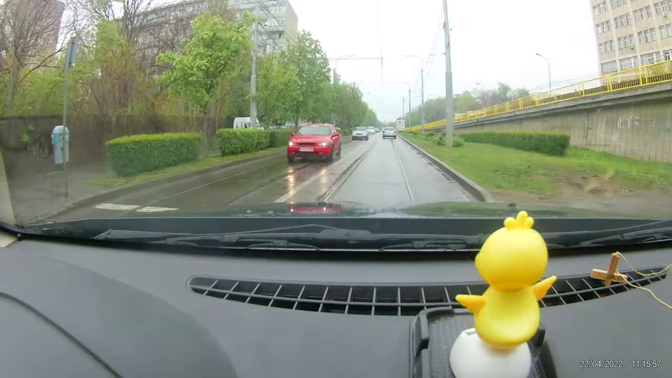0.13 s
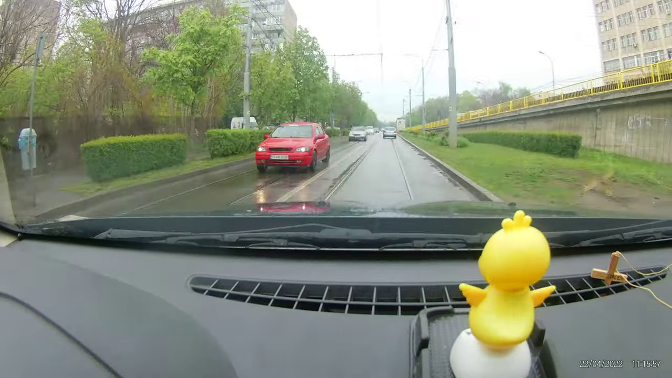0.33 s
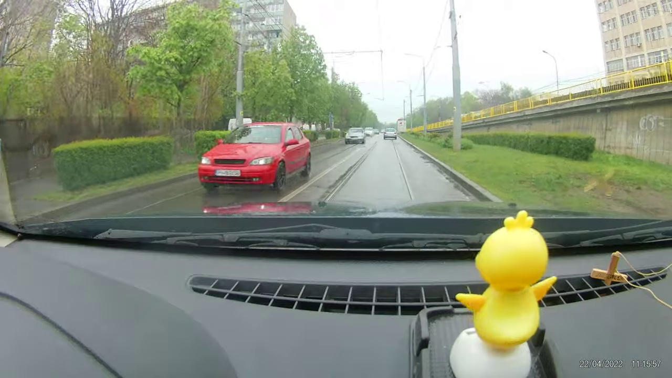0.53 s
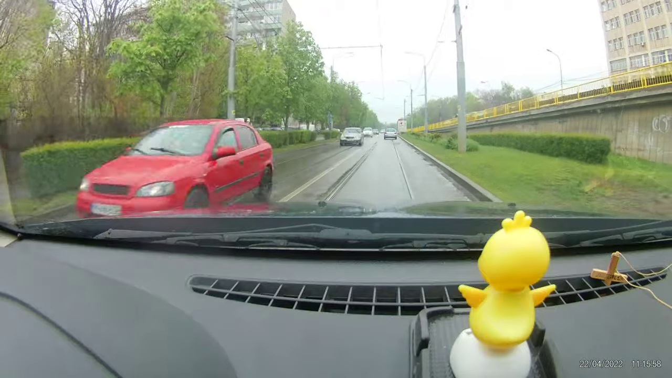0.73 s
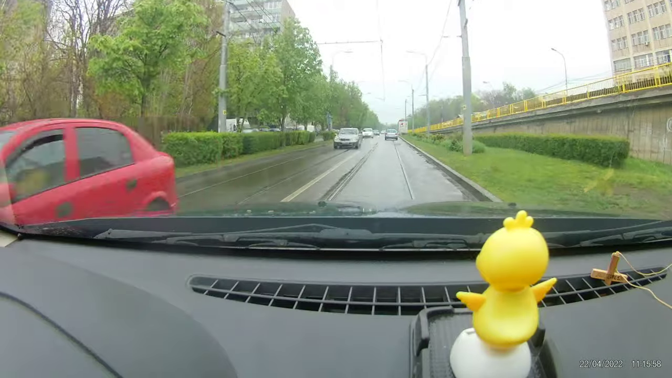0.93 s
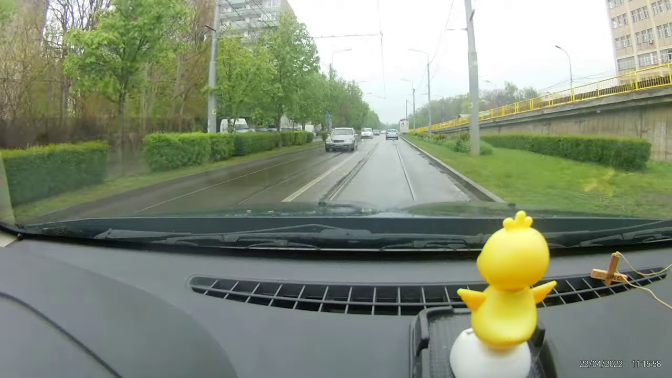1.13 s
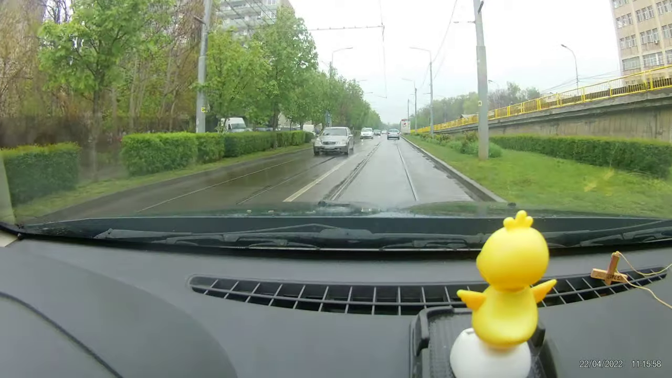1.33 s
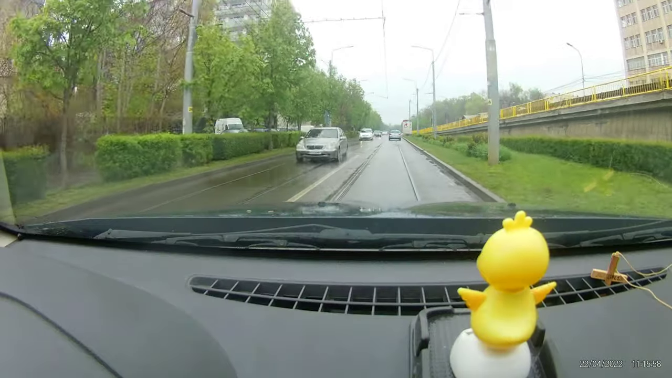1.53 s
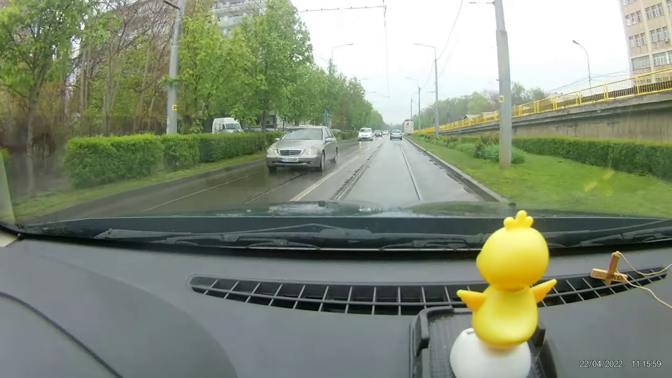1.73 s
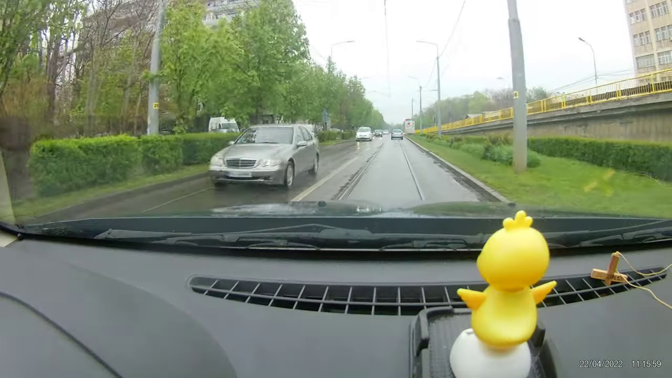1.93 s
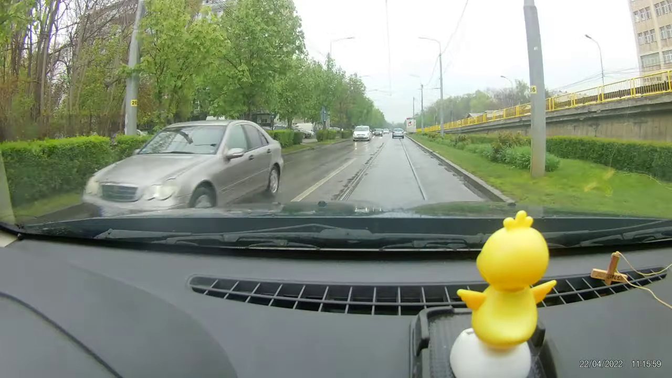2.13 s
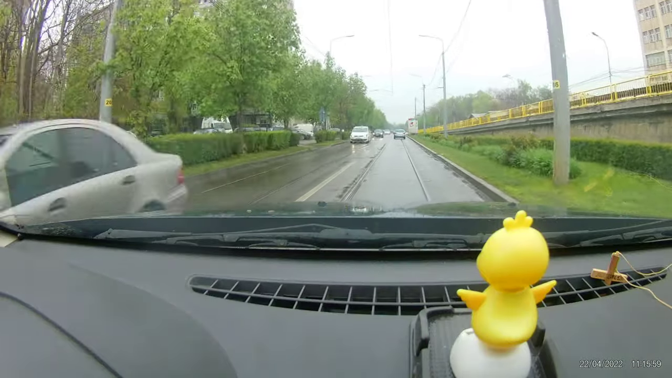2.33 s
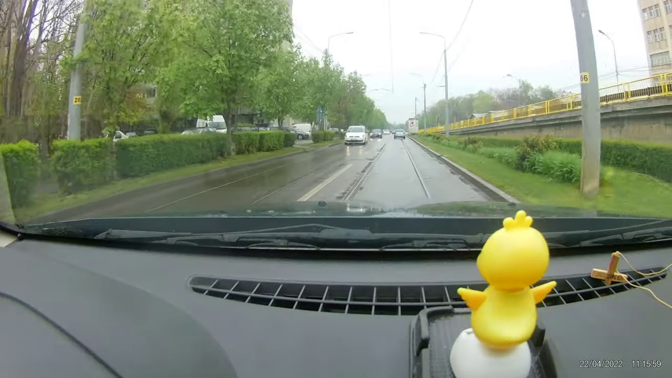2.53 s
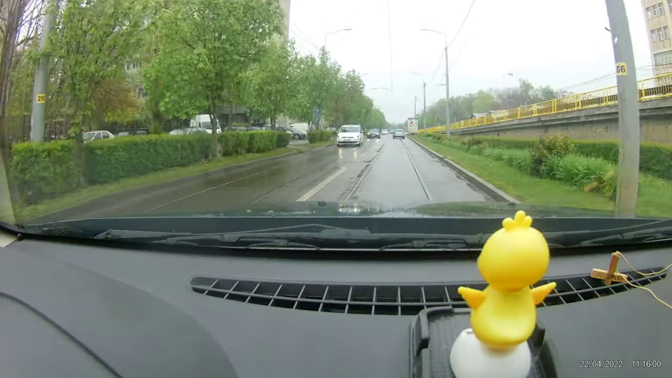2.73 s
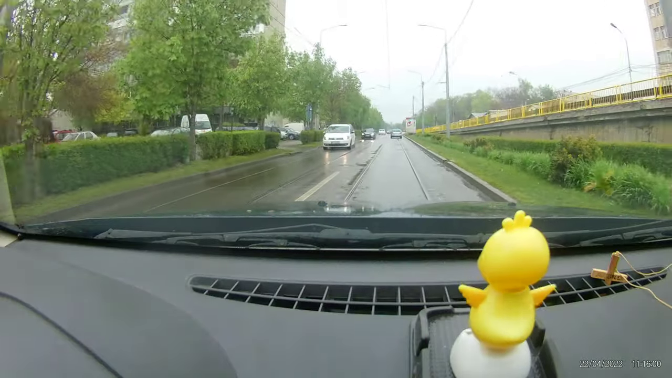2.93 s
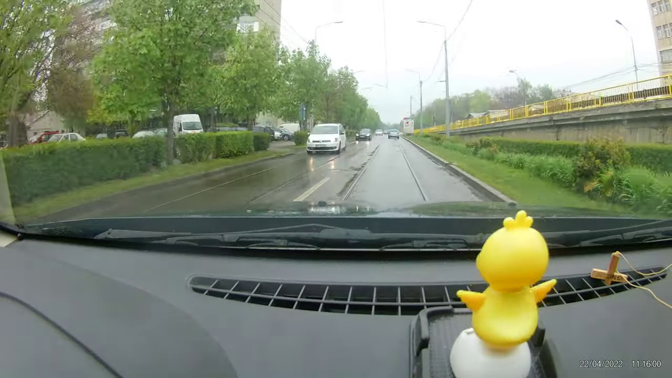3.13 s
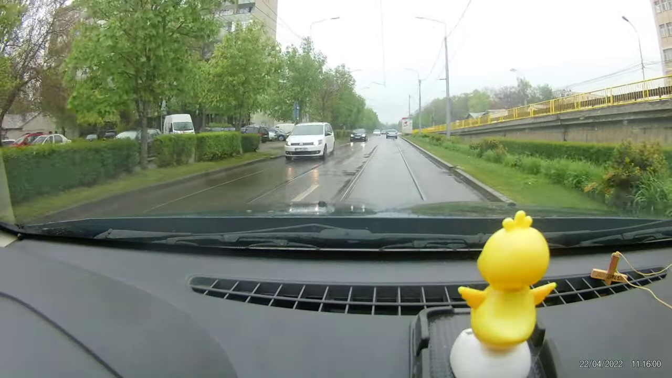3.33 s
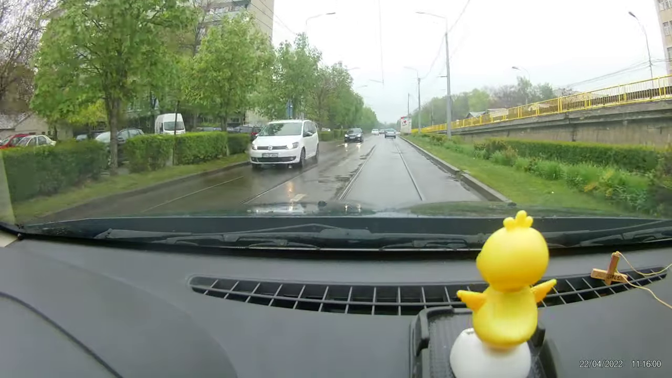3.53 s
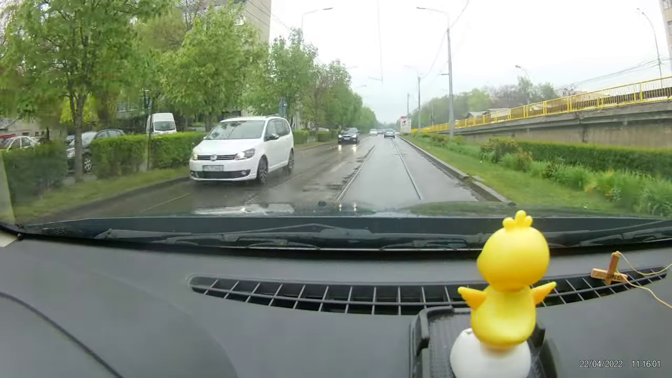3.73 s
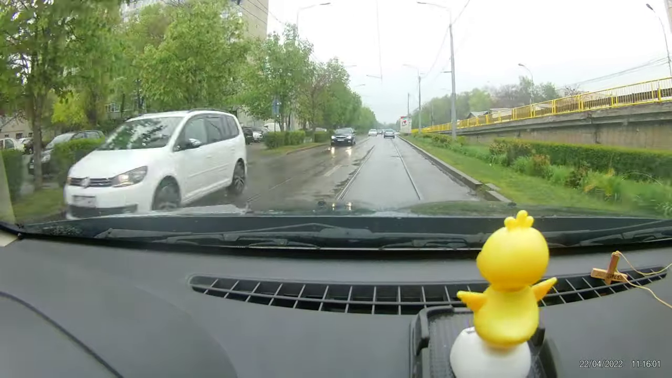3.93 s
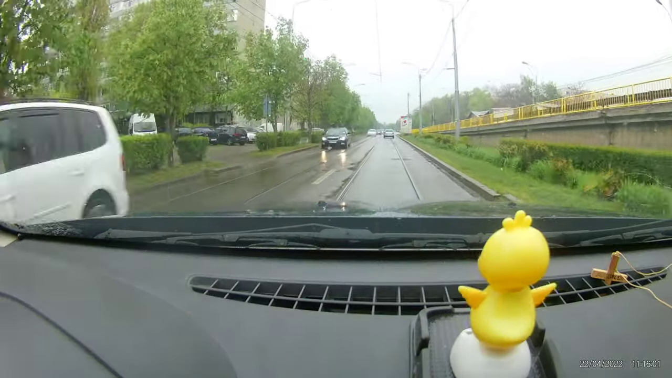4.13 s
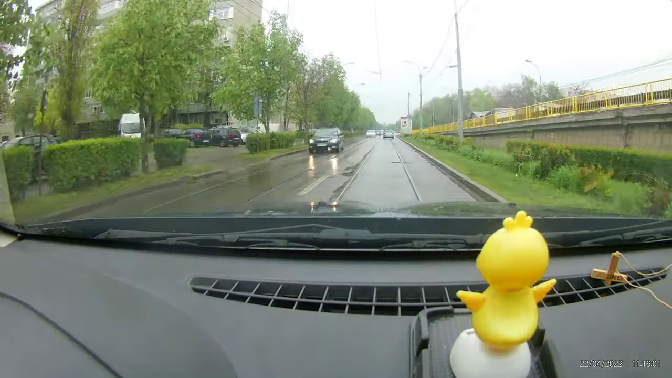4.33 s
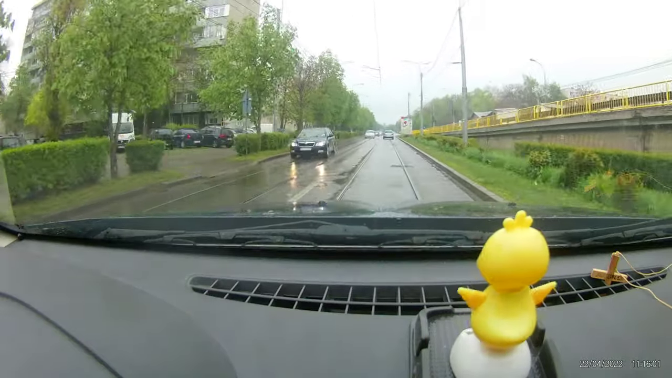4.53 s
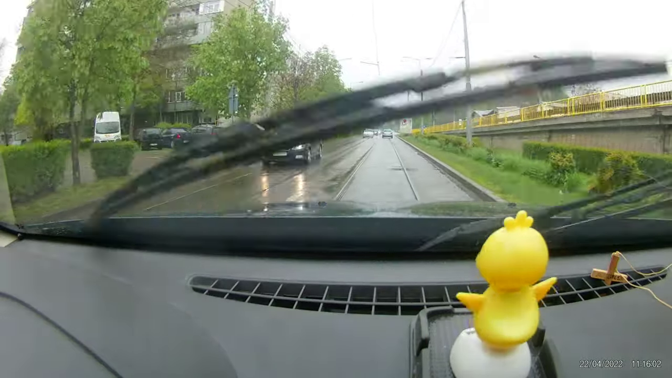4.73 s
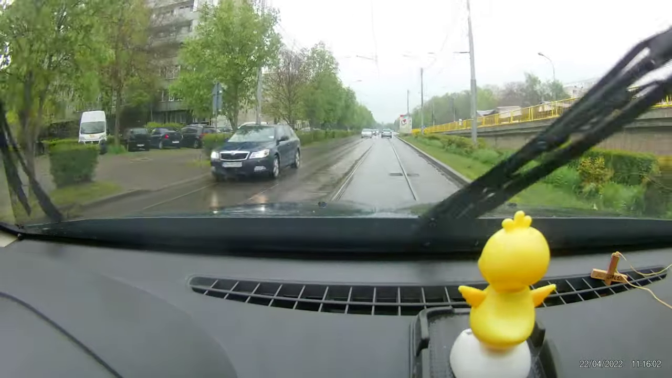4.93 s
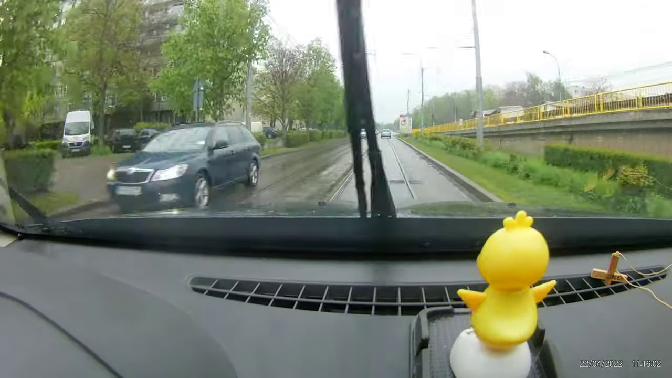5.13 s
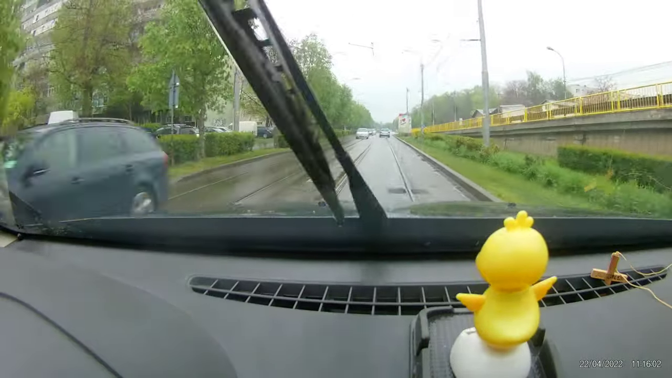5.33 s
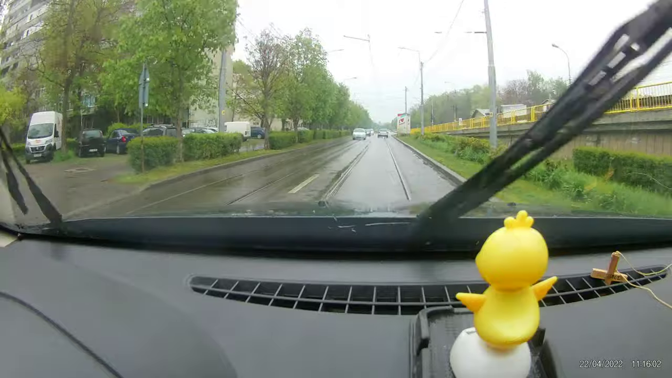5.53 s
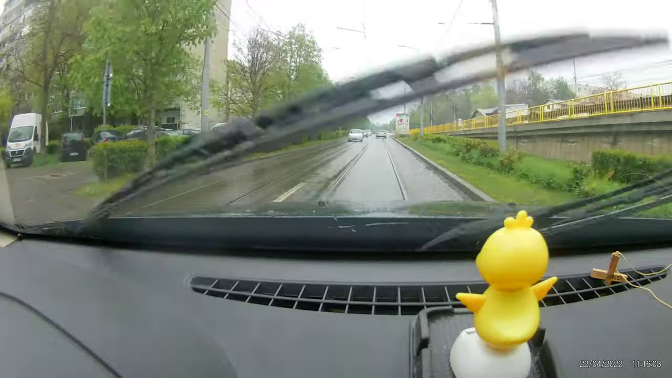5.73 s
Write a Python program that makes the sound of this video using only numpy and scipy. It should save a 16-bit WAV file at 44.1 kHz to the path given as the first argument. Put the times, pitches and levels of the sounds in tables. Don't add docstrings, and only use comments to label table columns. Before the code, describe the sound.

A mono dashboard microphone hears a dull, bass-heavy car cabin: engine hum, body boom, muffled tyre hiss on wet tarmac. Four gentle passing swells of roar and spray come and go. A few trim rattles and clicks occur midway, then a rough rubbery wiper squeak after five seconds, a knock as the blade turns over, and another passing car.

```python
import sys
import numpy as np
from scipy import signal
from scipy.fft import rfft, irfft, next_fast_len
from scipy.io import wavfile
from scipy.ndimage import uniform_filter1d, map_coordinates

SR = 44100
rng = np.random.default_rng(int(sys.argv[2]) if len(sys.argv) > 2 else 0)


def persist_wave(psi):
    counts = np.round(np.clip(psi, -1, 1) * 32767).astype(np.int16)
    wavfile.write(sys.argv[1], SR, np.atleast_2d(counts).T)


def makeup_ratio(level_db):
    decades = np.asarray(level_db, float) / 20
    return 10 ** decades


N = 260190

# t/s, firing f/Hz, level/dB
ENGINE_RUN = [(0, 42.3, -37.5), (.3, 43.38, -31.5), (.6, 43.67, -28), (.82, 45.1, -22.5), (1.2, 46.48, -26),
              (1.5, 47.57, -29.5), (1.8, 48.5, -36), (2.02, 49.26, -42), (2.25, 50.45, -32),
              (2.95, 52.72, -30.5), (3.3, 53.86, -30), (3.6, 54.18, -41), (4.1, 55.38, -32),
              (4.35, 53.37, -32.5), (4.5, 53, -27.5), (4.7, 52.25, -46), (5.9, 49.34, -45.5)]
# f/Hz, level/dB
ENGINE_MOUNTS = [(82, -41.5), (92, -48), (102, -50), (112, -48.5), (128, -49), (148, -65), (161, -47.5),
                 (168, -51.5)]
# t/s, half length/s, f/Hz,
# glide/(Hz per s), level/dB
WHINE_GLIDES = [(0.356, 0.97, 578, 28.5, -58.5), (1.9, 0.5, 516, 33.5, -50.5), (2.3, 0.38, 620, 63, -59.5),
                (3.3, 0.45, 511, 3, -53.5), (4.901, 0.2, 584, 55, -51.5), (.87, 0.024, 1900, 1, -64),
                (1.074, 0.028, 1985, -100, -58), (1, .03, 1740, -100, -60), (1.231, 0.042, 1088, -200, -45),
                (1.285, 0.021, 1800, 2, -59), (4.571, 0.032, 401, -1, -39.5), (3.45, .3, 161.3, 12, -46),
                (1.05, 0.17, 172, -40, -45.5), (1.8, 0.093, 98, 19, -41), (0.97, .2, 92, 12, -47),
                (.31, 0.041, 410, 3, -49.5)]
# f/Hz, level/dB
SHELL_SPECTRUM = [(12, -32.5), (22, -4), (30, 4.5), (38, -0.5), (60, -14), (90, -48)]
# f/Hz, level/dB
RUMBLE_SPECTRUM = [(35, -27), (60, -2.5), (68, -8.5), (76, -6.5), (157, -16), (182, -14), (209, -13),
                   (237, -22), (400, -31), (520, -59.5), (880, -120)]
# t/s, level/dB, half length/s
ROAD_JOINTS = [(0.137, -30, 0.035), (0.338, -28.5, 0.099), (0.598, -29, 0.057), (1.221, -30, 0.03),
               (1.36, -52, 0.022), (1.77, -30, 0.071), (2.083, -38, 0.13), (2.686, -32, 0.11),
               (3.069, -47, 0.046), (3.586, -37, 0.062), (3.765, -30.5, 0.11), (4.023, -13.5, 0.062),
               (4.23, -30, 0.022), (4.36, -21.5, 0.029), (4.47, -21, 0.054), (4.654, -26, 0.055),
               (4.98, -26.5, 0.049), (5.119, -32, 0.038), (5.35, -24, 0.067), (5.508, -35, 0.071),
               (5.672, -28, 0.037), (5.752, -22.5, 0.05)]
# t/s, level/dB
ROAD_COARSENESS = [(0, -43), (.6, -40), (1.25, -37.5), (1.5, -37.5), (2, -38.5), (2.3, -35.5), (2.8, -38.5),
                   (3.2, -37), (4, -36), (4.5, -32), (4.85, -35.5), (5.4, -32.5), (5.9, -32.5)]
# f/Hz, width/Hz, level/dB
STEADY_HUMS = [(209, 13.5, -51), (518.7, 29, -57.5), (127.14, 7.5, -47)]
# f/Hz, level/dB
OWN_ROAR_SPECTRUM = [(220, 1.5), (280, 2.5), (330, -3), (400, -0.5), (500, -1.5), (630, -2.5), (770, -9),
                     (920, -3.5), (1100, -13), (1330, -12.5), (1500, -24.5), (2000, -28), (2650, -29),
                     (2800, -41.5)]
# f/Hz, level/dB
WHEEL_ARCH_SPECTRUM = [(2400, -16.5), (2900, 0), (3600, -0.5), (4000, -1), (4500, -10), (5100, -14.5),
                       (5700, -14), (6400, -15), (7100, -16), (7900, -30)]
# t/s, half length/s, f/Hz, level/dB
CAVITY_NOTES = [(0.193, 0.25, 207, -48.5), (1.498, .3, 212.5, -44), (2.351, 0.072, 207.5, -44),
                (2.622, 0.13, 208.8, -44), (3.025, 0.26, 209.8, -44), (3.396, 0.36, 209, -48),
                (4.092, 0.45, 208.1, -43.5), (4.856, 0.31, 207, -42.5), (5.647, 0.14, 213, -46)]
# t abreast/s, roar level/dB, spray level/dB, time scale coming/s, time scale going/s
ONCOMING_CARS = [
    (1.18, -44, -63, 0.14, 0.17),
    (2.57, -45, -67, 0.13, 0.12),
    (4.33, -48.5, -63.5, .11, 0.22),
    (5.63, -46.5, -64.5, 0.13, 0.17),
]
# f/Hz, level/dB
PASSING_SPECTRUM = [(550, -9.5), (750, 3), (920, 0.5), (1100, -0.5), (1330, -8.5), (1500, -15), (1720, -14),
                    (2000, -18), (2250, -22.5), (2600, -28.5), (3000, -43.5)]
# f/Hz, level/dB
SPRAY_SPECTRUM = [(2300, -13.5), (2850, -2.5), (3150, -5), (3500, -3.5), (4000, -1.5), (4500, -0.5),
                  (5100, -4), (5800, -4), (6400, -8), (7100, -13.5), (7800, -30.5), (9200, -27.5),
                  (10500, -39.5)]
# f/Hz, width/Hz, level/dB
WINDOW_PANES = [(1110, 46, 3), (1700, 70, 2), (2040, 65, 1), (2630, 120, 1.5), (3670, 99, 2.5),
                (4800, 220, -0.5), (5780, 300, 2)]
# t/s, peak level/dB, brightness level/dB, ring f/Hz
HARD_TICKS = [(3.288, -65, -21, 4510), (3.969, -59, 4, 3077), (3.989, -48, 5.5, 4180),
              (3.992, -52, 3.5, 6040), (3.997, -58.5, 0, 5800), (3.993, -49, -1.5, 4800),
              (4.13, -61.5, -7, 4290), (4.639, -48, 0.5, 4750), (4.64, -51, 0.5, 4500),
              (4.742, -55, -12, 4490), (4.783, -53, 5.5, 4520), (4.906, -48, -3, 4700),
              (5.761, -59, -8, 4530)]
# f/Hz, level/dB, time to fall 60 dB/s
PLASTIC_MODES = [(1798, 7, 0.025), (2396, 4.5, 0.029), (3840, -9, 0.027), (4920, -4, 0.016),
                 (5840, -4, 0.01)]
# t/s, level/dB, f/Hz, time to fall 60 dB/s
SOFT_RATTLES = [(.61, -36, 537, 0.15), (.635, -32, 574, .08), (.64, -32.5, 1053, 0.06),
                (.652, -36, 1193, .05), (0.691, -18, 125, 0.17), (1.761, -25, 445, 0.049),
                (1.241, -33.5, 1070, 0.081), (3.456, -32, 708, 0.02), (3.991, -41, 209, 0.11),
                (4.59, -33, 595, 0.035), (4.704, -41, 1390, 0.039), (4.738, -41, 1464, .03),
                (4.76, -45, 1448, .03), (4.787, -47, 1760, .03), (4.912, -46, 1950, .04),
                (4.345, -51, 3700, 0.049)]
# t/s, length/s, level/dB, second then third partial level below the first/dB
BLADE_SLIPS = [(5.088, 0.02, -22.5, -10.5, -23.5), (5.115, 0.013, -23, -7.5, -19),
               (5.129, .012, -18.5, -19, -31.5), (5.14, 0.015, -19, -8, -17),
               (5.161, 0.012, -21, -7.5, -16), (5.171, .012, -19, -10, -20),
               (5.184, 0.013, -16, -17, -26.5), (5.196, 0.015, -14.5, -6, -12.5),
               (5.208, .011, -21, 3.5, -14.5), (5.22, 0.0092, -24.5, -3, -13),
               (5.229, 0.013, -15, -24, -27.5), (5.242, 0.007, -18.5, -11.5, -10.5),
               (5.249, .008, -21, 4, -10), (5.257, .011, -17.5, -2, -24.5), (5.27, 0.011, -21, -11, -8)]
# t/s, f/Hz
SLIP_PITCH = [(5.088, 433), (5.126, 442), (5.143, 380.6), (5.18, 376), (5.2, 339), (5.218, 332.9),
              (5.234, 372), (5.248, 336.1), (5.29, 329.6)]
# t/s, level/dB
EDGE_CATCHES = [(5.19, -28.5), (5.206, -18.5), (5.214, -11.5), (5.227, -16), (5.241, -14), (5.252, -11.5),
                (5.259, -11.5), (5.265, -21), (5.272, -12.5), (5.281, -21.5)]
# t/s, half length/s, level/dB
SINGING_PARTIALS = [
    [(5.15, .008, -50), (5.188, .011, -31.5), (5.204, .008, -28), (5.25, .011, -29.5), (5.276, 0.0076, -44)],
    [(5.143, 0.0066, -55), (5.203, 0.013, -29.5), (5.244, 0.0083, -47), (5.28, .007, -49.5)],
]
# t/s, half length/s, level/dB
DRY_SCRAPES = [(5.145, .015, -59), (5.181, 0.0099, -54.5), (5.202, .014, -47.5), (5.244, 0.013, -50),
               (5.275, .009, -55)]
# f/Hz, width/Hz, level/dB
WINDSCREEN_MODES = [(405, 28, -0.5), (476, 46, -2), (539, 44, 2), (680, 7.5, 2), (950, 110, -2),
                    (1010, 120, -10), (1150, 38, -1.5), (1440, 66, -4.5), (1720, 130, -11.5),
                    (2200, 560, -26), (2940, 250, -49)]
# f/Hz, width/Hz, level/dB
WIPER_ARM_MODES = [(241, 17, -0.5)]
# f/Hz, width/Hz, level/dB
RASP_MODES = [(1150, 500, 6), (2250, 450, 6), (2750, 400, 2), (3750, 500, 2.5), (4400, 454, -3.5)]
# t/s, blow level/dB, crack level/dB
FLIP_BLOWS = [
    (5.3718, -18.5, -50),
    (5.3775, -6.5, -35),
    (5.3833, -3, -35),
    (5.387, -18, -44),
    (5.3938, -14.5, -50),
    (5.397, -20, -54),
    (5.41, -15, -60),
]
# f/Hz, width/Hz, level/dB
COWL_MODES = [(105, 13, 2.5), (159, 18, 2), (180, 15, -1.5), (265, 31, -1), (410, 56, -2), (584, 36, -1.5),
              (750, 60, -10.5), (970, 100, -5.5), (1470, 760, -24.5), (2190, 190, -13), (2690, 600, -21.5),
              (3740, 670, -38)]
# f/Hz, width/Hz, level/dB
CLIP_MODES = [(2900, 900, -7), (3750, 500, -4), (4900, 900, -15)]
# f/Hz, level/dB
HISS_SPECTRUM = [(3000, -21.5), (6000, -3.5), (8000, -2), (11000, -2.5), (13000, -1.5), (14800, 0),
                 (17000, 1.5)]


def unit(x):
    return x / np.sqrt(np.mean(x ** 2) + 1e-20)


def curves(rows):
    s, *cols = np.transpose(rows)
    return [np.interp(np.arange(N) / SR, s, c) for c in cols]


def wobble(rate, size=N):
    knots = rng.standard_normal(int(size * rate / SR) + 4)
    return map_coordinates(knots, [np.arange(size) * rate / SR])


def swell(s, half):
    out, reach = np.zeros(N), round(4 * half * SR) + 1
    near = np.arange(max(round(s * SR) - reach, 0), min(round(s * SR) + reach, N))
    out[near] = np.exp(-((near / SR - s) / half) ** 2)
    return out


def filtered(x, response):
    m = next_fast_len(N + SR // 2)
    return irfft(rfft(x, m) * response(np.fft.rfftfreq(m, 1 / SR)), m)[:N]


def body(x, modes):
    def response(f):
        total = 0
        for k, (hz, width, db) in enumerate(modes):
            total = total + (-1) ** k * makeup_ratio(db) * 1j * f * width / (hz * hz - f * f + 1j * f * width)
        return total
    return filtered(x, response)


def rush(spectrum, patchy_db):
    z = signal.stft(rng.standard_normal(N), nperseg=512)[2]
    field = uniform_filter1d(uniform_filter1d(rng.standard_normal(z.shape), 6, 0), 10, 1)
    x = signal.istft(z * makeup_ratio(patchy_db * unit(field)), nperseg=512)[1][:N]
    f, db = np.transpose(spectrum)

    def colour(hz):
        return makeup_ratio(np.interp(np.log(hz + 1), np.log(f + 1), db, left=-120, right=-120))
    return unit(filtered(x, colour))


def engine():
    hz, load_db = curves(ENGINE_RUN)
    f, mount_db = np.transpose(ENGINE_MOUNTS)
    levels = [load_db]
    for order in (2, 3):
        load_swing = 0.27 * (load_db - load_db.mean())
        levels.append(np.interp(order * hz, f, mount_db) + load_swing + 3 * wobble(3.2))
    turn = 2 * np.pi * np.cumsum(hz) / SR + 0.37 * wobble(12)
    orders = 0
    for k, db in enumerate(levels):
        orders = orders + makeup_ratio(db + (0.95 + 0.61 * k) * wobble(14)) * np.sin((k + 1) * turn + k)
    return np.sqrt(2) * orders


def whines():
    mesh_hz = 516.6 + 3.01 * wobble(1.4)
    whine = makeup_ratio(-60.5 + 0.7 * wobble(16)) * np.sin(2 * np.pi * np.cumsum(mesh_hz) / SR)
    t = np.arange(N) / SR
    shake = 2 * np.pi * np.cumsum(2.62 * wobble(15)) / SR
    for s, half, hz, glide, db in WHINE_GLIDES:
        phase = 2 * np.pi * (hz + glide * (t - s) / 2) * (t - s) + shake
        whine = whine + makeup_ratio(db) * swell(s, half) * np.sin(phase)
    return np.sqrt(2) * whine


def shell_and_rumble():
    jolts = sum(makeup_ratio(db) * swell(s, half) for s, db, half in ROAD_JOINTS)
    coarse_db, = curves(ROAD_COARSENESS)
    shell = np.sqrt(2) * np.sin(2 * np.pi * np.cumsum(30 + 3.817 * wobble(10)) / SR)
    boom = 0.61 * shell + 0.52 * rush(SHELL_SPECTRUM, patchy_db=1.0)
    boom_gain = makeup_ratio(-36 + 2.8 * wobble(8)) + jolts
    rumble_gain = makeup_ratio(coarse_db - 2.5 + 0.33 * wobble(9)) + makeup_ratio(-24.5) * jolts
    return boom_gain * boom + rumble_gain * rush(RUMBLE_SPECTRUM, patchy_db=-0.7)


def hums():
    out = 0
    for hz, width, db in STEADY_HUMS:
        mode = [(hz, width, 0)]
        out = out + makeup_ratio(db) * unit(body(body(rng.standard_normal(N), mode), mode))
    coarse_db, = curves(ROAD_COARSENESS)
    return out * makeup_ratio(0.55 * (coarse_db - coarse_db.mean()))


def own_tyres():
    coarse_db, = curves(ROAD_COARSENESS)
    own = makeup_ratio(-45.5 + 0.49 * (coarse_db - coarse_db.mean()) + 0.35 * wobble(2.0))
    gain = np.hypot(own, 0.55 * passing_roar())
    water = makeup_ratio(-31.0) * rush(WHEEL_ARCH_SPECTRUM, patchy_db=3.0)
    return gain * (rush(OWN_ROAR_SPECTRUM, patchy_db=2.0) + water)


def cavity():
    t = np.arange(N) / SR
    shake = 2 * np.pi * np.cumsum(3 * wobble(14)) / SR
    note = 0
    for s, half, hz, db in CAVITY_NOTES:
        note = note + makeup_ratio(db) * swell(s, half) * np.sin(2 * np.pi * hz * t + shake)
    return np.sqrt(2) * makeup_ratio(2.3 * wobble(17)) * note


def passing(column, falls_db, far_db, lag_s, linger, wake_db=-40):
    power = makeup_ratio(far_db) ** 2
    for row in ONCOMING_CARS:
        t = np.arange(N) / SR - row[0] - lag_s
        gaps = t / np.where(t > 0, linger * row[4], row[3])
        afar = makeup_ratio(-5.5) * np.exp(t / 0.57)
        wake = makeup_ratio(wake_db) * np.exp(-t / 0.55)
        skirt = np.where(t > 0, wake, afar) * np.clip(gaps ** 2, 0, 1)
        alongside = makeup_ratio(-falls_db * np.log10(1 + gaps ** 6))
        power = power + makeup_ratio(row[column]) ** 2 * (alongside ** 2 + skirt ** 2)
    return np.sqrt(power)


def passing_roar():
    return passing(column=1, falls_db=6, far_db=-58, lag_s=0, linger=0.89)


def traffic():
    spray = passing(column=2, falls_db=7, far_db=-81.5, lag_s=0.04, linger=0.8)
    mist = makeup_ratio(-0.3) * passing(column=2, falls_db=5.5, far_db=-81.5, lag_s=0.06, linger=1.9, wake_db=-6)
    water = rush(SPRAY_SPECTRUM, patchy_db=0.4)
    coarse = filtered(water, lambda hz: 1 / (1 + (hz / 5360) ** 8))
    fine = water - coarse
    surge = makeup_ratio(0.4 * wobble(15))
    roar = passing_roar() * rush(PASSING_SPECTRUM, patchy_db=2.0)
    return surge * (roar + makeup_ratio(-2.0) * (spray * coarse + mist * fine))


def ticks():
    out, t = np.zeros(N + SR), np.arange(SR // 6) / SR
    for s, db, bright_db, ring_hz in HARD_TICKS:
        modes = PLASTIC_MODES + [(ring_hz, 5, 0.018)]
        ring = 0
        for change_db, (hz, level, t60) in zip(rng.normal(0, 2.8, len(modes)), modes):
            mode_db = level + change_db + bright_db * (hz > 3000) - 60 * t / t60
            ring = ring + makeup_ratio(mode_db) * np.sin(2 * np.pi * hz * t)
        snap = 0.6 * makeup_ratio(bright_db - 60 * t / 0.01) * np.diff(rng.standard_normal(len(t) + 1))
        rough = 1 + 0.91 * wobble(1410, size=len(t))
        out[round(s * SR):][:len(t)] += makeup_ratio(db - 7.5) * (ring + snap) * rough * (1 - np.exp(-t / 0.0015))
    for s, db, hz, t60 in SOFT_RATTLES:
        rough = 0.74 + 0.48 * wobble(0.21 * hz, size=len(t))
        knock = np.sin(2 * np.pi * hz * t) * (1 - np.exp(-t * hz / 3.1))
        out[round(s * SR):][:len(t)] += makeup_ratio(db - 60 * t / t60) * rough * knock
    return out[:N]


def squeak():
    tone, blows = np.zeros((2, N))
    slip_hz, = curves(SLIP_PITCH)
    drying = 0.84 * np.clip((np.arange(N) / SR - 5.095) / 0.1, 0.12, 1)
    turns = np.cumsum(slip_hz * (1 + 0.022 * drying * wobble(300))) / SR
    count = int(turns[-1]) + 1
    sizes = np.clip(0.92 * rng.standard_normal(count), -1, 1)
    sizes = sizes + 0.69 * (-1) ** np.arange(count)
    grain = rng.standard_normal((2, N))
    grit = uniform_filter1d(grain[0], size=6)
    flutter_db = 1.3 * drying * wobble(260)
    for s, length, db, second_db, third_db in BLADE_SLIPS:
        u = np.arange(round(1.2 * length * SR)) / (length * SR)
        span = slice(round(s * SR), round(s * SR) + len(u))
        cycle, harsh = turns[span], drying[span]
        fade = np.clip(u / 0.2, 0, 1) * np.clip((1.2 - u) / 0.31, 0, 1)
        grip = makeup_ratio(db + flutter_db[span]) * fade
        levels = [0, second_db] + [third_db - 9.5 * k for k in range(7)]
        partials = 0
        for k, level in enumerate(levels):
            waver_db = min(k, 1) * 3.5 * wobble(240, size=len(u))
            partials = partials + makeup_ratio(level + waver_db) * np.sin(2 * np.pi * (k + 1) * cycle + k)
        tone[span] += 1.13 * grip * partials
        late = 16 * (cycle % 1)
        release = np.e * late * np.exp(-late)
        size = sizes[cycle.astype(int)]
        blows[span] += makeup_ratio(11) * harsh ** 1.8 * grip * release * (size + 1.2 * grit[span])
    for k, rows in enumerate(SINGING_PARTIALS):
        gain = sum(makeup_ratio(db) * swell(s, half) for s, half, db in rows)
        tone = tone + gain * np.sin(2 * np.pi * (k + 4) * turns)
    blows = blows + sum(makeup_ratio(db + 13) * swell(s, 0.00036) for s, db in EDGE_CATCHES)
    tone = filtered(tone, lambda f: 1 / (1 + (f / 1900) ** 8) + 0.08)
    scrape = sum(makeup_ratio(db) * swell(s, half) for s, half, db in DRY_SCRAPES)
    scrape = scrape * (1 + 0.7 * np.cos(2 * np.pi * turns)) * makeup_ratio(2.5 * wobble(180)) * grain[1]
    rasp = body(body(scrape, RASP_MODES), RASP_MODES)
    arm = makeup_ratio(2.5) * body(body(blows, WIPER_ARM_MODES), WIPER_ARM_MODES)
    mix = tone + body(blows, WINDSCREEN_MODES) + arm + rasp
    return filtered(mix, lambda f: 1 / (1 + (f / 5300) ** 8))


def flip():
    blows, cracks = np.zeros((2, N))
    t = np.arange(SR // 50) / SR
    main_s = FLIP_BLOWS[2][0]
    for s, db, crack_db in FLIP_BLOWS:
        push_s = 0.00022 + 0.011 * max(s - main_s, 0)
        push = np.exp(-((t - 0.001) / push_s) ** 2)
        rattle = 0.09 * makeup_ratio(-60 * t / 0.016) * rng.standard_normal(len(t))
        blows[round(s * SR):][:len(t)] += makeup_ratio(db + 8.5) * (push + rattle)
        cracks[round(s * SR):][:len(t)] += makeup_ratio(crack_db - 60 * t / 0.0098) * rng.standard_normal(len(t))
    direct = 0.25 * uniform_filter1d(blows, size=15)
    return direct + body(blows, COWL_MODES) + body(cracks, CLIP_MODES)


def last_swing():
    since = np.clip(np.arange(N) / SR - 5.879, 0, None)
    return -makeup_ratio(-13.5 - 60 * since / 1.5) * np.sin(2 * np.pi * 33.5 * since)


def cabin(x):
    t = np.arange(SR // 8) / SR
    tail = uniform_filter1d(rng.standard_normal(len(t)), size=5) * makeup_ratio(-60 * t / 0.12)
    near = x + makeup_ratio(-16.0) * signal.fftconvolve(x, tail / np.linalg.norm(tail))[:N]
    return signal.sosfilt(signal.butter(6, 6500, fs=SR, output="sos"), near)


def through_windows(x):
    def gain(f):
        peaks_db = sum(db * np.exp(-((f - hz) / width) ** 2) for hz, width, db in WINDOW_PANES)
        return makeup_ratio(peaks_db - 0.53 * (f > 900))
    return filtered(x, gain)


def scene():
    motor = engine() + whines()
    outside = shell_and_rumble() + hums() + own_tyres() + traffic() + last_swing()
    contacts = ticks() + makeup_ratio(-1.0) * squeak() + flip()
    return (motor + through_windows(outside) + cavity() + cabin(contacts))[None]


def top_cut(x):
    return signal.sosfilt(signal.butter(12, 15720, fs=SR, output="sos"), x)


def record(dry):
    hiss = makeup_ratio(-80.5) * rush(HISS_SPECTRUM, patchy_db=1.5)
    return top_cut(dry + hiss)


dry = scene()
out = record(dry)
persist_wave(out)
```